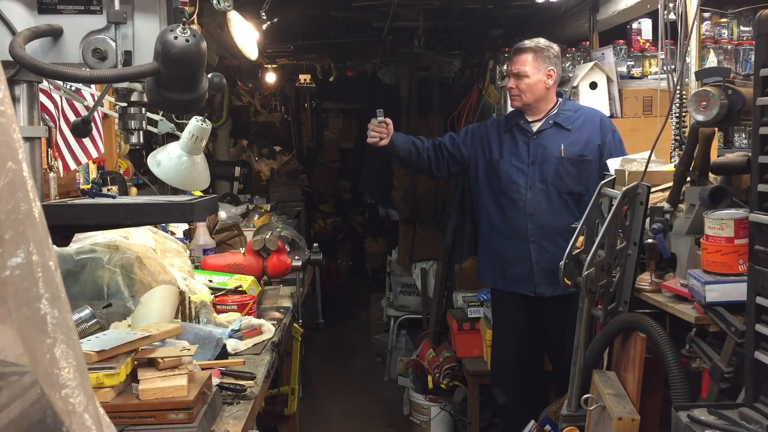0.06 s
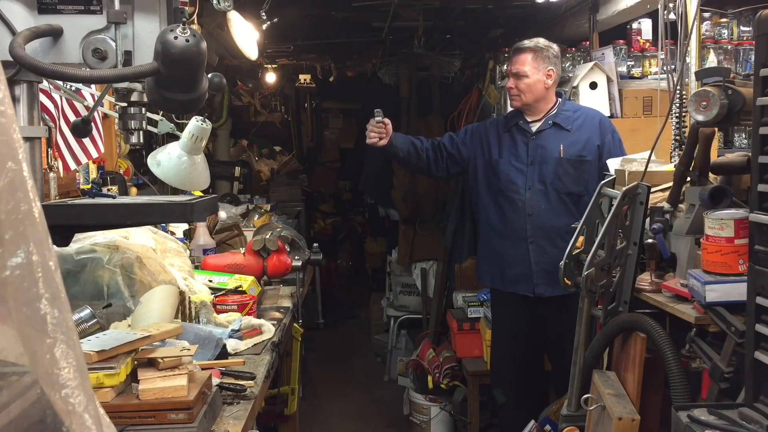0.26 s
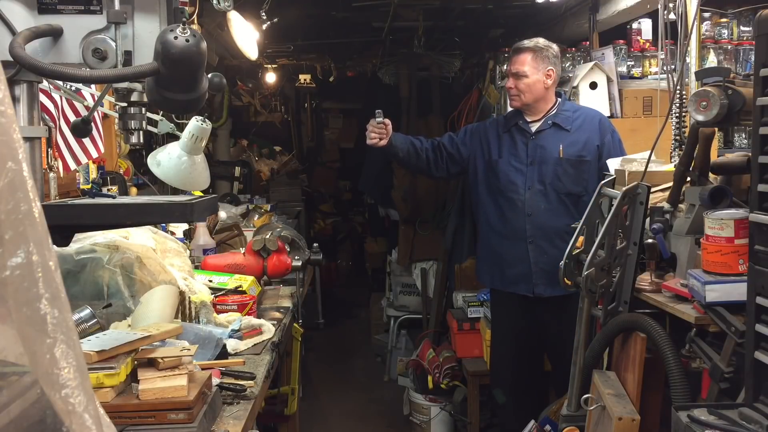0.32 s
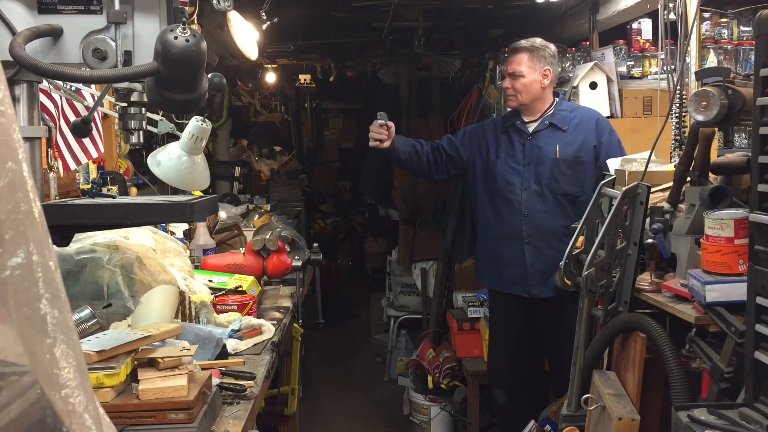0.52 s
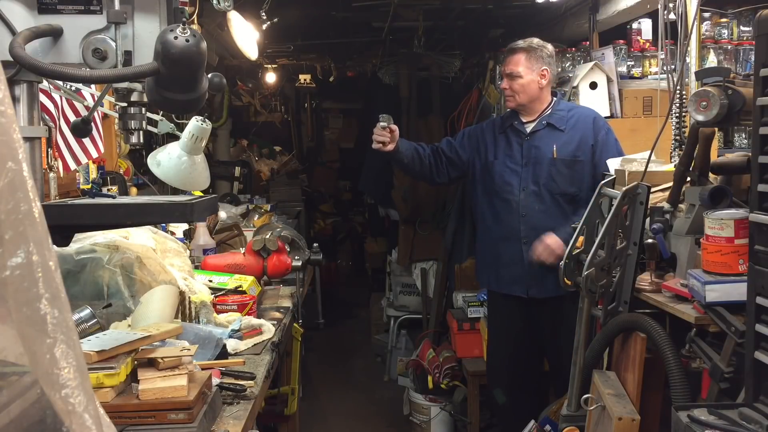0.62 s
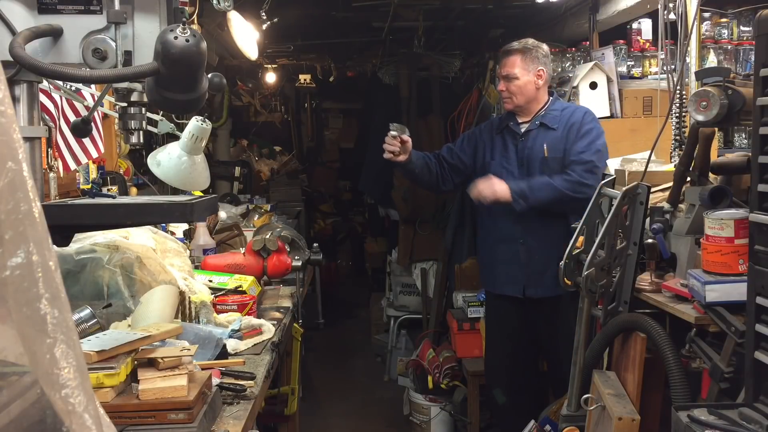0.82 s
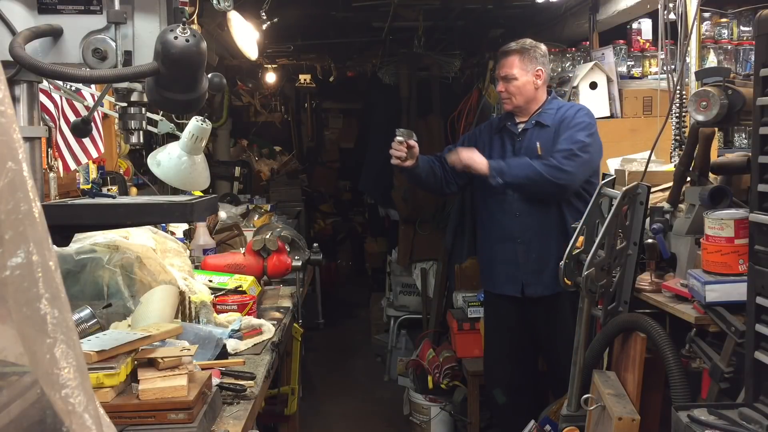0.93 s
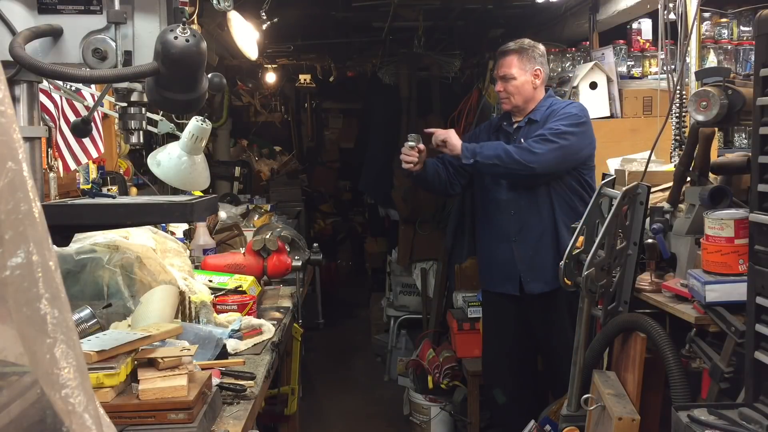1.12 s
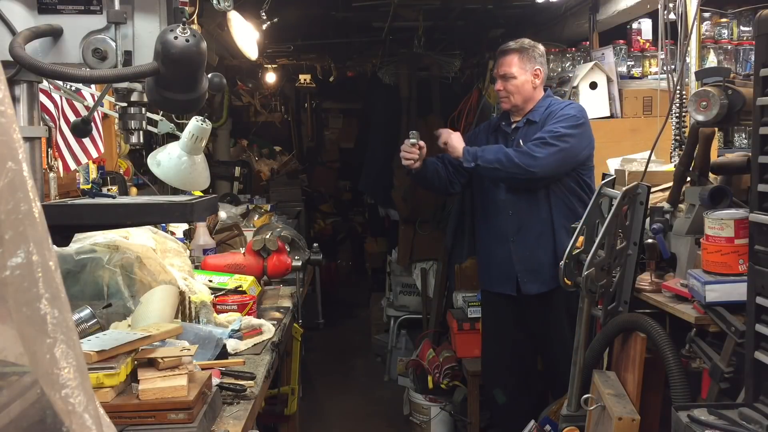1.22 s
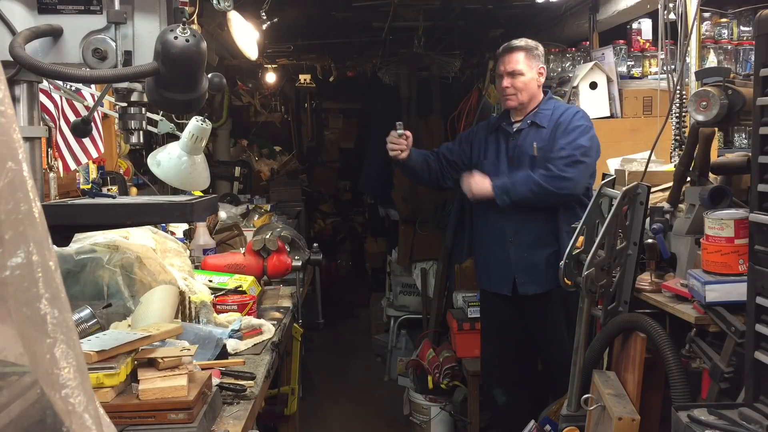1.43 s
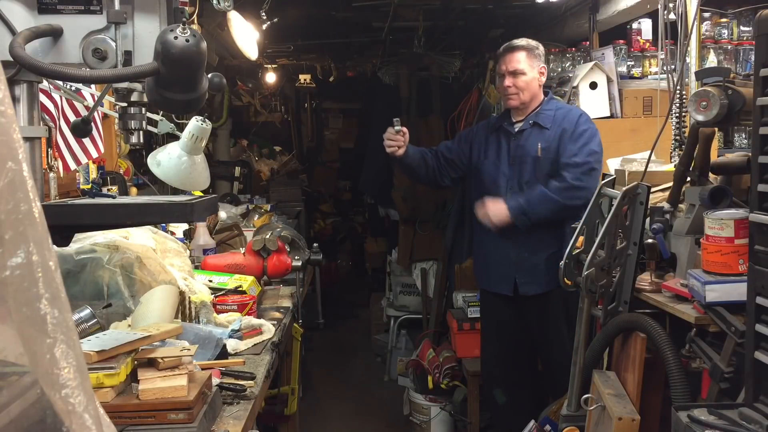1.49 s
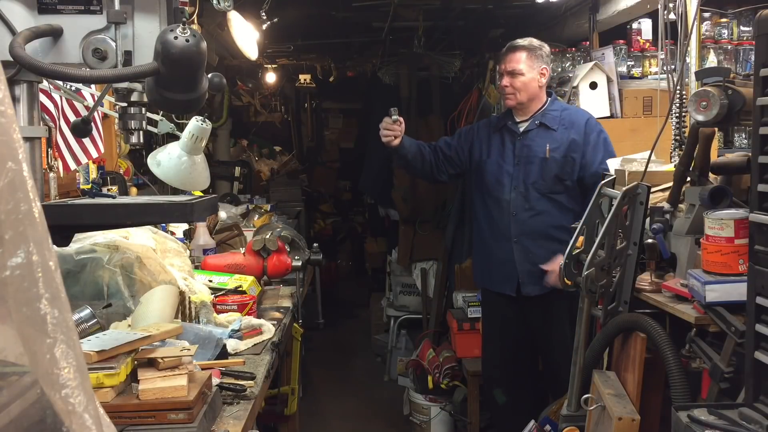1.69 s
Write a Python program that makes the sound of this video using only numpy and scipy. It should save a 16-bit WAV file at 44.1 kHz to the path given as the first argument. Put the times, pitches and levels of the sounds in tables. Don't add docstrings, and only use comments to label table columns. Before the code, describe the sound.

One hard pop from a spring-and-air toy gun, picked up in mono and clipping the microphone; soft creaking leads in, a light metal click follows, then only low room hum and faint hiss remain.

```python
import sys
import numpy as np
from scipy import signal
from scipy.io import wavfile

SR = 44100
rng = np.random.default_rng(int(sys.argv[2]) if len(sys.argv) > 2 else 0)


def dump(signal):
    limited = np.clip(np.atleast_2d(signal).T, -1, 1)
    pcm = np.round(limited * 32767).astype(np.int16)
    wavfile.write(sys.argv[1], SR, pcm)


def magnitude_from_level(level_db):
    exponent = np.asarray(level_db, float) / 20
    return 10 ** exponent


N = 77175
T = np.arange(N) / SR
BURST_S = 0.2088

# frequency in Hz, spectral density in dB per Hz.
BLAST = [(150, -47.5), (250, -17), (555, -22), (784, -15.5), (1110, -18.5), (1740, -7), (2920, -6),
         (7070, 0.5), (15700, -19)]


def unit(x):
    return x / np.sqrt(np.mean(x ** 2) + 1e-20)


def at_hz(points, hz):
    table_hz, values = np.array(points)[:, :2].T
    return np.interp(np.log(hz), np.log(table_hz), values)


def dying(start, t60):
    return (T >= start) * magnitude_from_level(-60 * np.maximum(T - start, 0) / t60)


def ring(clicks, hz, t60):
    radius = magnitude_from_level(-60 / (t60 * SR))
    angle = 2 * np.pi * hz / SR
    poles = [1, -2 * radius * np.cos(angle), radius * radius]
    return signal.lfilter([0, np.sin(angle)], poles, clicks + 1e-18)


def highpass(x, hz):
    return signal.sosfilt(signal.butter(4, hz, "high", fs=SR, output="sos"), x)


def coloured(spectrum, start=None):
    # frequency in Hz, t60 in seconds.
    room = [(250, .07), (500, 0.16), (1100, .145), (2900, .135), (7700, .122), (14000, .105)]
    low, high = spectrum[0][0], spectrum[-1][0]
    edges = np.geomspace(low, high, int(3 * np.log2(high / low)) + 1)
    white = rng.standard_normal((2, N + 4000))
    steady, shaped = 0, 0
    for k, (lo, hi) in enumerate(zip(edges, edges[1:])):
        hz = np.sqrt(lo * hi)
        sos = signal.butter(2, [lo, hi], "band", fs=SR, output="sos")
        band = magnitude_from_level(at_hz(spectrum, hz)) * signal.sosfilt(sos, white[k % 2])[-N:]
        steady = steady + band
        shaped = shaped + band * (1 if start is None else dying(start, at_hz(room, hz)))
    return shaped / np.std(steady)


def duck(depth_db, back_s, time_s):
    return magnitude_from_level(np.interp(T, [BURST_S, BURST_S + .03, back_s, back_s + time_s], [0, depth_db, depth_db, 0]))


def workshop():
    # frequency in Hz, spectral density in dB per Hz.
    hum_colour = [(12, -50.5), (20, -19.5), (43, -4.5), (65, 2), (89, -4.5), (145, -19.5), (197, -19.5),
                  (252, -35), (500, -42.5), (650, -70.5), (1100, -120)]
    hiss_colour = [(240, -32.5), (400, -5), (875, -9.5), (1040, -8.5), (1390, -9.5), (2410, -10),
                   (15700, -23)]
    hum_db, hiss_db, boom_db = -49, -72, -2.5
    boom_hz, boom_t60_s = 64, .1
    rumble = rng.standard_normal(N + SR)
    boom = ring(ring(rumble, boom_hz, boom_t60_s), boom_hz, boom_t60_s)
    boom = unit(boom[SR:])
    hum = magnitude_from_level(hum_db) * unit(coloured(hum_colour) + magnitude_from_level(boom_db) * boom)
    hiss = magnitude_from_level(hiss_db) * coloured(hiss_colour)
    hum_gain = duck(depth_db=-13.5, back_s=0.804, time_s=0.031)
    hiss_gain = duck(depth_db=-5.5, back_s=0.65, time_s=.25)
    return hum_gain * hum + hiss_gain * hiss


def trigger():
    # time in seconds, level in dB.
    pull = [(0.0, -68), (0.06, -70.5), (0.066, -69.5), (0.11, -61), (0.118, -57.5), (0.15, -59),
            (0.172, -50.5), (0.1855, -49)]
    back = [(0.468, -68), (0.47, -56), (0.498, -62.5), (0.503, -61), (0.534, -66), (0.5447, -44.5)]
    # frequency in Hz, spectral density in dB per Hz.
    rub_colour = [(410, -51), (700, -18.5), (1090, -18), (1390, 1.5), (2870, -11.5), (6020, -14.5),
                  (7400, -16), (14200, -18), (15500, -20)]
    # frequency in Hz, width in Hz, level in dB.
    rub_peaks = [(1490, 200, 1), (2200, 200, 3.5), (4270, 460, -4), (5650, 250, -3), (9700, 590, -5),
                 (12000, 400, -7), (14000, 400, -6.5)]
    slips_per_s, ring_db = 7500, -3
    size = magnitude_from_level(1.3 * np.minimum(rng.exponential(1, N), 4))
    happens = rng.random(N) < slips_per_s / SR
    slips = size * rng.choice([-1, 1], N) * happens
    rings = 0
    for hz, width, db in rub_peaks:
        rings = rings + magnitude_from_level(db) * unit(ring(slips * rng.standard_normal(N), hz, 2.0 / width))
    rub = unit(coloured(rub_colour) + magnitude_from_level(ring_db) * unit(rings))
    force = 0
    for rows in (pull, back):
        force = force + magnitude_from_level(np.interp(T, *np.transpose(rows), left=-120, right=-120))
    return force * highpass(rub, 1000)


def ticks():
    # start in seconds, level in dB, pitch in Hz, t60 in seconds.
    tick_rows = [(0.037, -68, 9455, 0.17), (0.069, -62.5, 12500, 0.07), (0.116, -57.5, 6230, 0.03),
                 (0.118, -57.5, 8300, 0.023), (0.161, -47, 2360, .25), (0.142, -57.5, 1370, .5),
                 (0.148, -59, 9700, 0.086), (0.150, -58, 14000, .1), (0.174, -47, 10000, 0.031),
                 (0.173, -51, 14000, 0.11), (0.1875, -39.5, 7500, .03), (0.193, -38.5, 8530, 0.01),
                 (0.1971, -36.5, 2774, 0.17), (0.337, -63, 1480, 0.045), (0.469, -56.5, 6220, 0.079),
                 (0.4714, -55.5, 12000, .04), (0.479, -63, 2050, .04), (0.502, -61, 9700, 0.036),
                 (0.5, -64, 6300, 0.068), (0.805, -63, 1400, 0.042), (1.722, -65, 390.8, 0.44)]
    rise_cycles, ring_cycles = 5.0, 20
    noise = rng.standard_normal(N)
    out = np.zeros(N)
    for start, db, hz, t60 in tick_rows:
        t60_ring = ring_cycles / hz
        tone = unit(ring(ring(noise, hz, t60_ring), hz, t60_ring))
        rise = np.clip((T - start) * hz / rise_cycles, 0, 1)
        out += magnitude_from_level(db) * dying(start, t60) * rise * tone
    return out


def catch():
    click = 1. * (np.arange(N) == int(0.1856 * SR))
    return -magnitude_from_level(-14) * ring(click, hz=2600, t60=0.00091)


def latch():
    # frequency in Hz, width in Hz, level in dB, t60 in seconds.
    latch_modes = [(1400, 160, -55, 0.14), (1849, 125, -49, 0.15), (2144, 180, -48.5, 0.093),
                   (3068, 130, -45, 0.11), (3700, 300, -46, 0.16), (4300, 150, -49.5, .07),
                   (6614, 200, -44, 0.13), (7010, 300, -38, 0.14), (8976, 400, -49, 0.14),
                   (12500, 500, -45, .08)]
    # frequency in Hz, spectral density in dB per Hz.
    tail_colour = [(600, -49), (1100, -18), (1900, -7.5), (2600, -17.5), (3500, -5.5), (5200, -5),
                   (12000, -7), (17000, -7)]
    start_s, rattle_s, rattle_db = 0.5449, .0055, 0.5
    tail_db, tail_t60_s = -41, 0.15
    out = magnitude_from_level(tail_db) * dying(start_s, tail_t60_s) * coloured(tail_colour)
    for hz, width, db, t60 in latch_modes:
        rough = ring(rng.standard_normal(N), hz, 1.694 / width)
        rough = unit(ring(rough, hz, 1.56 / width))
        out = out + magnitude_from_level(db) * dying(start_s, t60) * rough
    rattle = 1 + magnitude_from_level(rattle_db) * (T < start_s + rattle_s)
    return highpass(out * rattle, 550)


def piston():
    start_s, hiss_db = 0.1858, -43
    knock_db, knock_db_per_s, knock_hz = -36.5, 798, 334
    bulge_s, bulge_db, bulge_len_s = 0.2048, -11, .0030
    run = (T >= start_s) * (T < BURST_S)
    hiss = magnitude_from_level(hiss_db) * coloured(BLAST)
    growth = magnitude_from_level(knock_db + knock_db_per_s * np.clip(T - start_s, 0, .03))
    knock = growth * unit(ring(rng.standard_normal(N), knock_hz, .02))
    phase = np.clip((T - bulge_s) / bulge_len_s, 0, 1) ** 2.0
    bulge = magnitude_from_level(bulge_db) * np.sin(np.pi * phase)
    return run * (hiss + knock) + bulge * (1 + .25 * rng.standard_normal(N))


def thump():
    start_s, level_db, rise_s = 0.2078, 11, .005
    glide_hz, end_hz, glide_s = 224, 48, .0057
    t60_s, bend = .06, 1.2
    t = np.maximum(T - start_s, 0)
    turns = end_hz * t + glide_hz * glide_s * (1 - np.exp(-t / glide_s))
    level = magnitude_from_level(level_db - 60 * (t / t60_s) ** bend)
    return -level * (1 - np.exp(-t / rise_s)) * np.sin(2 * np.pi * turns)


def burst():
    # frequency in Hz, spectral density in dB per Hz.
    crack_colour = [(150, -28), (250, -0.5), (1410, -13), (7320, -15.5), (7850, -16), (14600, -26),
                    (15700, -29)]
    # frequency in Hz, level in dB, t60 in seconds.
    barrel_modes = [(408.3, -16.5, 0.057), (642, -5.5, .04), (915, -19, .035), (2050, -8, .03),
                    (8330, -13.5, .04)]
    crack_db, crack_t60_s, tail_db = 7, 0.024, -3
    crack = magnitude_from_level(crack_db) * dying(BURST_S, crack_t60_s) * coloured(crack_colour)
    blow = dying(BURST_S, .01) * rng.standard_normal(N)
    barrel = sum(magnitude_from_level(db) * ring(blow, hz, t60) / 5 for hz, db, t60 in barrel_modes)
    tail = magnitude_from_level(tail_db) * coloured(BLAST, start=BURST_S)
    return thump() + crack + barrel + tail


def scene():
    mechanism = trigger() + ticks() + catch() + latch()
    return (workshop() + mechanism + piston() + burst())[None]


def top_cut(x):
    return signal.sosfilt(signal.butter(12, 15840, fs=SR, output="sos"), x)


def record(dry):
    sos = signal.cheby2(14, 30, 15900, fs=SR, output="sos")
    mix = np.clip(signal.sosfilt(sos, dry), -1.0, 1.0)
    return top_cut(mix)


dry = scene()
out = record(dry)
dump(out)
```